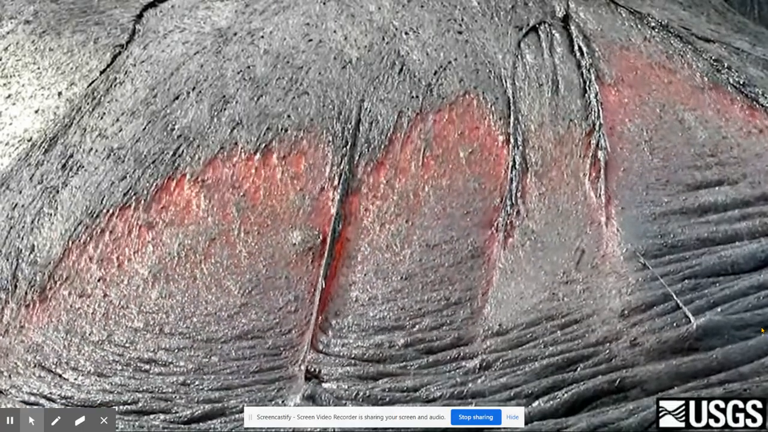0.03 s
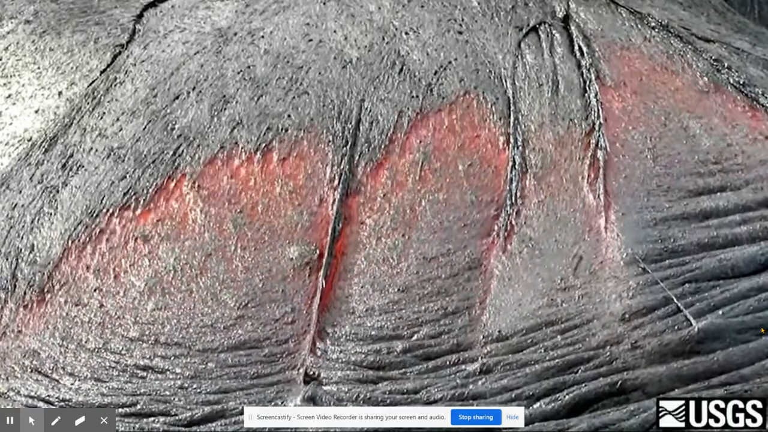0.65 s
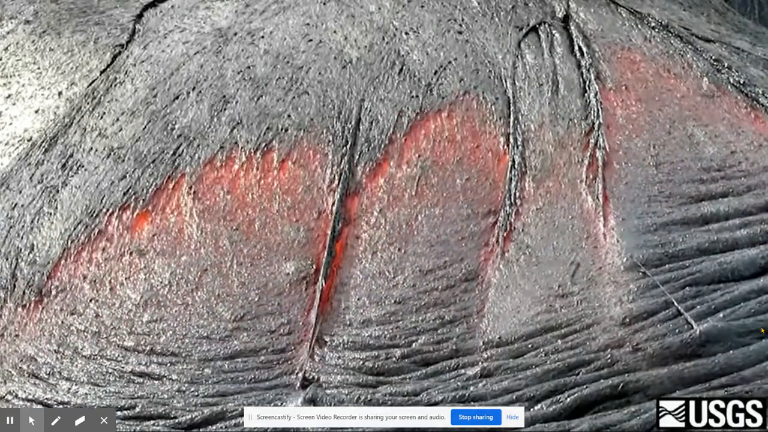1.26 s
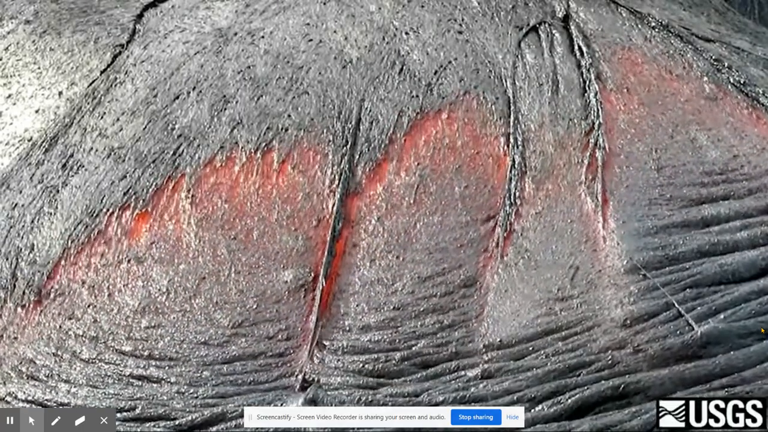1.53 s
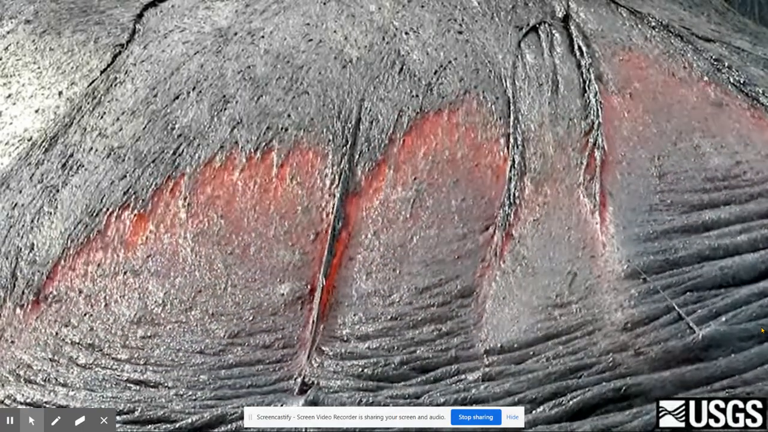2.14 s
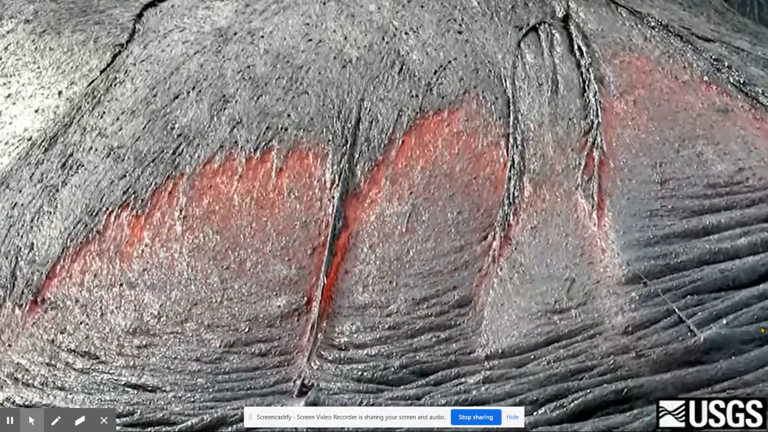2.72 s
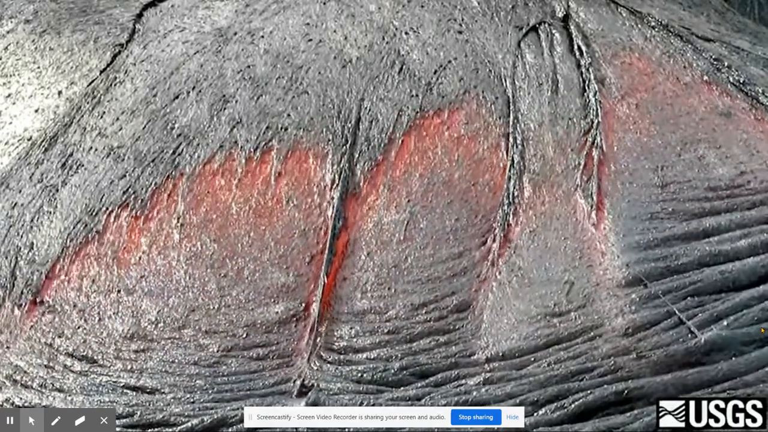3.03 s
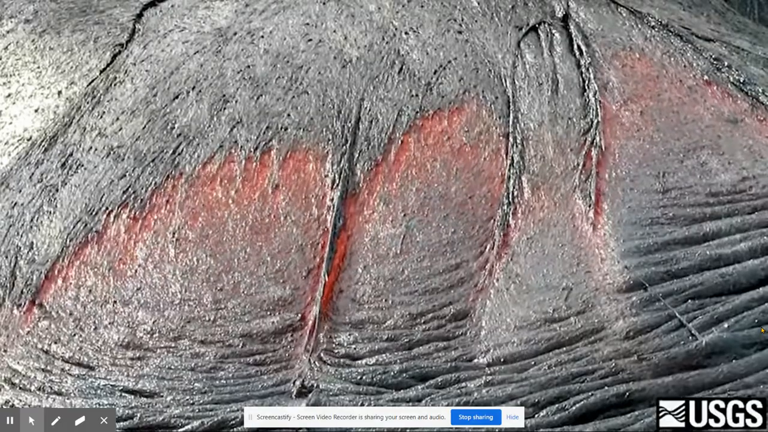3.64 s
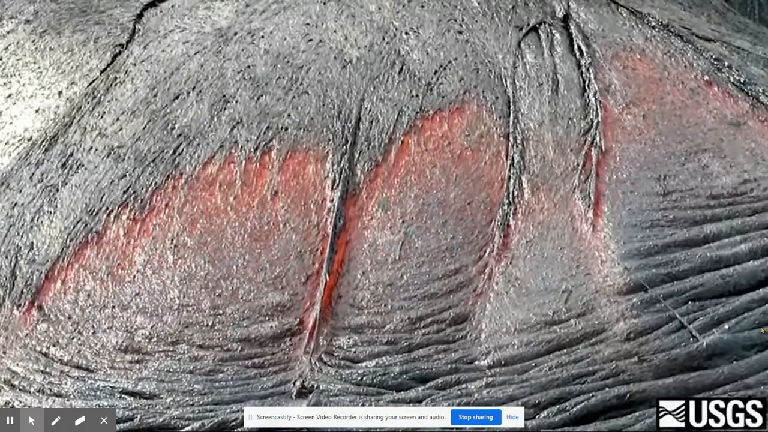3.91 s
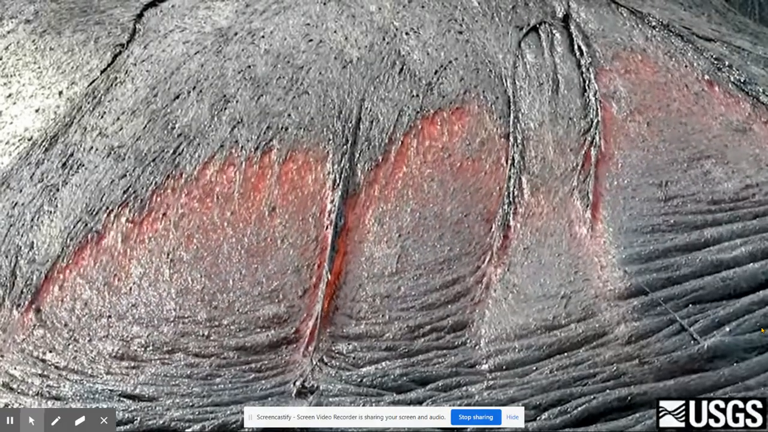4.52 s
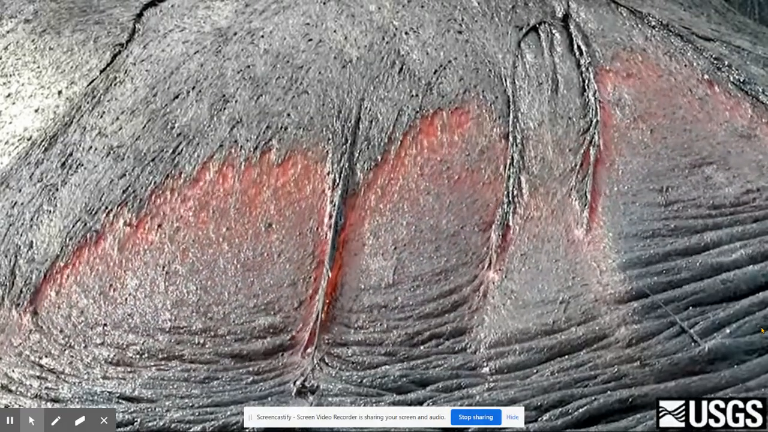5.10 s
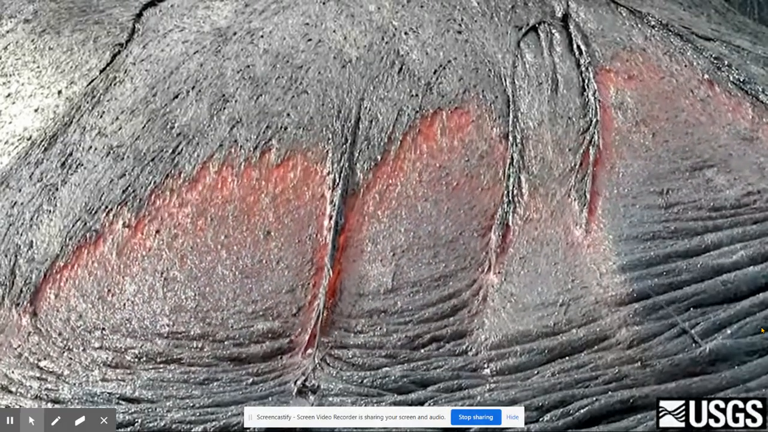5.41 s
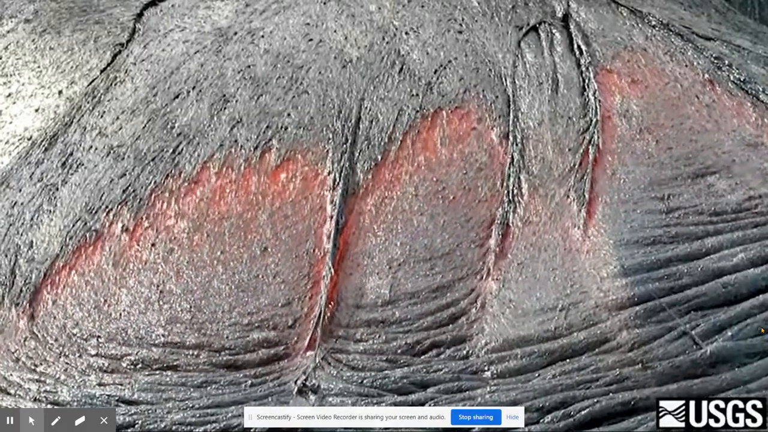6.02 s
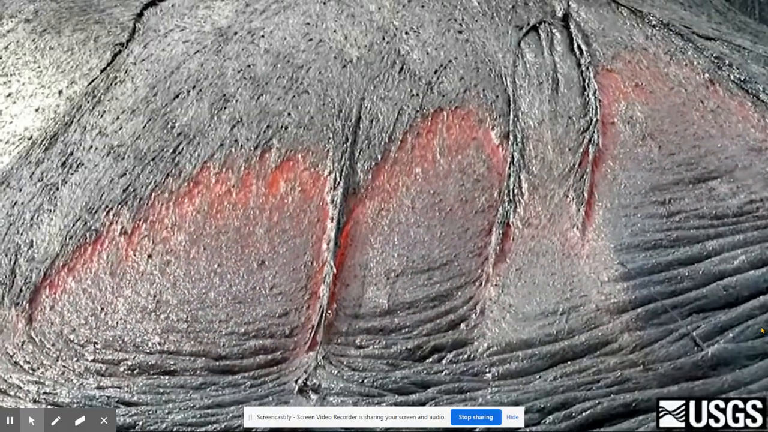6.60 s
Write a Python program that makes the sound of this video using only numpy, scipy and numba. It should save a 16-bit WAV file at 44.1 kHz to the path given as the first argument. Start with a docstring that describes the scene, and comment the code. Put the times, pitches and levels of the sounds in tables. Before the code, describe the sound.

Soft puffs of wind touch an outdoor microphone while glassy flakes snap off cooling lava in faint, scattered ticks and thin sizzles. The wind then builds into loud, irregular buffeting that thumps and rumbles over the crackle. A dull hiss lies behind it all, dipping after the hardest gusts and creeping back. Everything has a very short slap echo.

```python
"""A lava flow cools outdoors over a faint hiss, with one short slap echo on everything.
At first, flakes of its glassy crust snap off in sparse ticks and fine sizzling patches while light wind
brushes the microphone. From about 3.5 s strong gusts buffet it, louder and brighter as the air speeds up.
The strongest push the recorder's gain down, so the hiss ducks and creeps back.
The crust ticks on beneath the wind, which eases just before the end."""
import sys
import numpy as np
from scipy import signal
from scipy.fft import rfft, irfft, next_fast_len
from scipy.io import wavfile
from scipy.ndimage import uniform_filter1d
from numba import njit

SR = 44100
rng = np.random.default_rng(int(sys.argv[2]) if len(sys.argv) > 2 else 0)


def bounce(signal):
    """Save signal as a 16-bit WAV file at the path given by the first command-line argument."""
    frames = np.transpose(np.atleast_2d(signal))
    limited = np.clip(frames, -1, 1)
    pcm = np.round(limited * 32767).astype(np.int16)
    wavfile.write(sys.argv[1], SR, pcm)


N = 297675
TIME = np.arange(N) / SR

# gusts at the microphone: t/s, length/s, relative level/dB, rumble level/dB, nominal low-pass f/Hz
GUSTS = [(.01, 0.028, -34, -47.5, 179.6), (0.278, 0.12, -42.5, -41.5, 240),
         (0.72, 0.032, -35.5, -41.5, 267), (0.836, 0.064, -42.5, -45, 237), (1.024, .13, -44, -44, 230),
         (1.298, 0.32, -42.5, -44, 250), (1.662, 0.12, -31, -34.5, 586), (2.028, .08, -28.5, -35, 350),
         (2.142, .17, -43.5, -39.5, 268), (2.716, .13, -56.5, -50.5, 180), (2.983, 0.046, -35, -34, 244),
         (3.106, 0.048, -36.5, -42, 210), (3.298, 0.011, -29.5, -38, 430), (3.358, 0.09, -45, -44, 280),
         (3.491, 0.09, -27.5, -33, 512), (3.617, 0.0091, -17, -36, 900), (3.683, 0.014, -15.5, -33, 1040),
         (3.697, 0.097, -22.5, -26, 650), (3.975, 0.024, -23, -35.5, 530), (4.134, 0.091, -18.5, -28, 950),
         (4.308, 0.13, -27.5, -28.5, 624), (4.496, 0.22, -21.5, -27.5, 740), (4.759, 0.036, -28, -44, 730),
         (4.826, 0.027, -17, -19.5, 1000), (4.953, 0.079, -26, -37, 540), (5.188, 0.061, -28.5, -34, 430),
         (5.262, 0.27, -24, -31.5, 616), (5.365, 0.0067, -20.5, -32, 1000), (5.561, 0.068, -21, -25, 1025),
         (5.744, 0.2, -27.5, -31, 575), (6.039, 0.043, -14.5, -19.5, 1040),
         (6.093, 0.041, -12.5, -25, 1960), (6.247, 0.12, -19, -21.5, 1000),
         (6.27, .008, -15.5, -25.5, 1400), (6.385, 0.59, -36, -35, 382), (6.625, 0.033, -16, -24, 1380)]
# single eddies that knock on the microphone: t/s, level/dB, f/Hz
EDDIES = [(0.731, -38, 176), (1.691, -20.5, 184), (1.762, -27.5, 272), (2.031, -28.5, 217),
          (2.994, -26, 142), (3.298, -28.5, 251), (3.556, -19, 270), (3.619, -6, 294), (3.675, -11, 392),
          (4.194, -13, 380), (4.222, -24, 1240), (4.224, -12, 707), (4.384, -19.5, 335),
          (4.502, -21.5, 340), (4.83, -7.5, 307), (5.293, -14.5, 242), (5.377, -11.5, 330),
          (5.567, -33, 427), (5.613, -29, 1030), (5.619, -9, 193), (5.951, -21, 315), (6.09, -19, 770),
          (6.115, -19, 1540), (6.275, -12.5, 785), (6.649, -20, 520)]


def from_db(db):
    """Decibels to gain."""
    return 10 ** (np.asarray(db) / 20)


def unit_rms(x):
    """Scale to unit rms."""
    return x / np.sqrt(np.mean(x ** 2) + 1e-20)


def swells(events, rest_db, rise_db_per_s, fall_db_per_s):
    """Envelope in dB of events (t/s, length/s, level/dB) that rise, hold and fall over a resting level."""
    power = from_db(rest_db) ** 2
    for s, length, db in events:
        before_s, after_s = np.maximum(s - TIME, 0), np.maximum(TIME - s - length, 0)
        drop_db = rise_db_per_s * before_s + fall_db_per_s * after_s
        near = drop_db < 70
        power = power + np.bincount(np.flatnonzero(near), from_db(db - drop_db[near]) ** 2, N)
    return 10 * np.log10(power)


def coloured(x, spectrum):
    """EQ white input of unit rms to a spectrum (f/Hz, level/dB per Hz), rolling off below its first row."""
    hz, db = np.transpose(spectrum)
    size = next_fast_len(N)
    bins = np.maximum(np.fft.rfftfreq(size, 1 / SR), 1)
    gain = from_db(np.interp(np.log(bins), np.log(hz), db)) * np.minimum(bins / hz[0], 1)
    return irfft(rfft(x, size) * gain, size)[:N] * np.sqrt(SR / 2)


def local_rms(x, span_s):
    """Running rms over a soft-edged window."""
    size = max(int(span_s * SR), 2)
    return np.sqrt(np.abs(uniform_filter1d(uniform_filter1d(x * x, size), size)) + 1e-20)


def evened(x, span_s, evenness=1.0):
    """Iron out chance swells, so that the airflow sets the dynamics."""
    return x * (local_rms(x, 10 * span_s) / local_rms(x, span_s)) ** evenness


def flutter(rate_hz):
    """Smooth random modulation of unit rms."""
    pole = np.exp(-2 * np.pi * rate_hz / SR)
    return unit_rms(signal.lfilter([1], [1, -2 * pole, pole * pole], rng.standard_normal(N + SR))[SR:])


@njit
def swept_low_pass(x, tuning, damping):
    """Two-pole state-variable low-pass; tuning is tan(pi * corner / SR) at every sample."""
    out, band, low = np.zeros(len(x)), 0., 0.
    for i in range(len(x)):
        g = tuning[i]
        band_pass = (band + g * (x[i] - low)) / (1 + g * (g + damping))
        out[i] = low + g * band_pass
        band, low = 2 * band_pass - band, 2 * out[i] - low
    return out


def place(out, s, sound):
    """Mix a short sound in at s seconds."""
    at = int(np.clip(round(s * SR), 0, N - len(sound)))
    out[at:at + len(sound)] += sound


def wind(breeze_db=-54, breeze_hz=148, db_per_octave=19, trim_db=-0.5,
         flutter_db=3.5, stir_db=4.5, stir_s=0.0042, brightening=0.38, damping=1.775):
    """Turbulence buffets the microphone: faster air is louder and opens the filter."""
    # turbulent pressure ahead of the filter: f/Hz, relative level/dB
    turbulence = [(30, -60.5), (50, -35), (75, -38), (105, -28), (150, -25), (300, -27), (430, -28.5),
                  (600, -39), (850, -38.5), (1200, -42), (1700, -42), (2500, -50), (5000, -41)]
    slopes = dict(rise_db_per_s=696, fall_db_per_s=403)
    strength_db = swells([(s, length, db) for s, length, db, _, _ in GUSTS], breeze_db, **slopes)
    # the corner rides the same slopes as the level
    lifts = [(s, length, db_per_octave * np.log2(0.9 * hz / breeze_hz)) for s, length, _, _, hz in GUSTS]
    corner_hz = breeze_hz * 2 ** (swells(lifts, 0, **slopes) / db_per_octave)
    # the air speed flutters, and each passing eddy stirs it up for a few milliseconds
    stirred = sum(np.exp(-.5 * np.minimum(((TIME - s) / stir_s) ** 2, 20)) for s, _, _ in EDDIES)
    surge = from_db(flutter_db * flutter(rate_hz=45) + stir_db * np.minimum(stirred, 1))
    tuning = np.tan(np.pi * np.clip(corner_hz * surge ** brightening, 20, SR / 10) / SR)
    pressure = coloured(rng.standard_normal(N), turbulence)
    for _ in range(3):
        pressure = swept_low_pass(pressure, tuning, damping)
    return evened(pressure, span_s=0.034, evenness=0.94) * from_db(strength_db + trim_db) * surge


def eddies(typical_width_s=0.0029, typical_hz=330, size=2048):
    """Each eddy knocks with a few pressure cycles; small ones are higher and pass sooner."""
    out, t = np.zeros(N), (np.arange(size) - size / 2) / SR
    for (s, db, hz), phase in zip(EDDIES, rng.random(len(EDDIES))):
        swell = np.exp(-.5 * (t / typical_width_s) ** 2 * hz / typical_hz)
        place(out, s + t[0], from_db(db) * swell * np.cos(2 * np.pi * (hz * t + phase)))
    return out


def rumble():
    """The largest, slowest eddies put weight under each gust and linger after it."""
    # deep pressure swings: f/Hz, relative level/dB
    spectrum = [(20, -27.5), (30, -15), (40, -10.5), (50, -9), (60, 7.5), (68, -1.5), (85, 0.5),
                (105, -7.5), (140, -25.5), (250, -58), (1000, -85.5)]
    gusts = [(s, length, rumble_db) for s, length, _, rumble_db, _ in GUSTS]
    level_db = swells(gusts, rest_db=-55.5, rise_db_per_s=279, fall_db_per_s=169)
    pressure = evened(coloured(rng.standard_normal(N), spectrum), span_s=0.16)
    return from_db(level_db) * unit_rms(pressure)


def snap(low_hz, high_hz, size=256):
    """One fracture: a band-limited click with a steep top and the energy of 1 ms at unit rms."""
    low_hz, high_hz = np.minimum([low_hz, high_hz], SR * .45)
    pulse = signal.sosfilt(signal.butter(7, high_hz, fs=SR, output="sos"), signal.unit_impulse(size))
    pulse = signal.sosfilt(signal.butter(2, low_hz, "high", fs=SR, output="sos"), pulse)
    return pulse * np.sqrt(SR / 1000 / np.sum(pulse ** 2))


def flake_ticks(band_ratio=4.2, crumbs_db=-7.5, cluster_s=0.011, crumb_chance=0.02, size=1536):
    """The larger flakes snap off one by one, each amid a small cluster of lesser cracks."""
    # snapping flakes: t/s, level/dB, top edge f/Hz
    flakes = [(.2121, -45.5, 13500), (0.4707, -39.5, 4690), (.6907, -43.5, 4500), (0.9044, -59, 13400),
              (1.421, -58, 14000), (1.2226, -54.5, 7000), (1.7436, -40.5, 3200), (1.973, -41.5, 6400),
              (2.116, -44.5, 4970), (2.022, -53, 5500), (2.3333, -54, 13900), (2.405, -49.5, 12700),
              (2.4347, -36, 4970), (2.5129, -41.5, 10100), (3.1853, -52, 12900), (3.2013, -47.5, 8000),
              (3.4547, -46.5, 9000), (3.957, -49.5, 3800), (4.2133, -51.5, 5000), (4.125, -51.5, 4760),
              (4.4908, -48, 3500), (5.3288, -51.5, 4800), (5.4881, -39.5, 3630), (5.492, -51, 6500),
              (5.82, -43.5, 5800), (5.9458, -50.5, 8000), (6.2827, -41.5, 3400), (6.7304, -49, 10200)]
    out, t = np.zeros(N), (np.arange(size) - size // 2) / SR
    for (s, db, hz), (draw, push) in zip(flakes, rng.random((len(flakes), 2, size))):
        crumbs = (draw < crumb_chance) * (2 * push - 1) * np.exp(-np.abs(t) / cluster_s)
        crumbs /= np.linalg.norm(crumbs) + 1e-9
        force = signal.unit_impulse(size, "mid") + from_db(crumbs_db) * crumbs
        place(out, s + t[0], from_db(db) * np.convolve(force, snap(hz / band_ratio, hz)))
    return out


def skin_sizzle(per_s=400, spread_db=3.5, hold_s=0.004, lead_db=9.5, rest_db=-82.5, wander_db=4.5):
    """Tiny fractures run through the glassy skin in patches, each set off by one thin, high snap."""
    # patches of skin that crack at once: t/s, level/dB
    patches = [(.21, -68), (.628, -70), (.728, -66), (.817, -82), (1.42, -68), (1.832, -68), (2.115, -65),
               (2.405, -62.5), (2.717, -57), (2.79, -69), (2.838, -64.5), (2.922, -68), (3.003, -65),
               (3.105, -73), (3.187, -66), (3.353, -66), (3.456, -63), (4.785, -68), (5.49, -67),
               (5.637, -64), (5.82, -68), (6.552, -65.5), (6.603, -59)]
    # tone of the finest flakes: f/Hz, relative level/dB
    spectrum = [(1500, -14.5), (4000, -6), (8000, -12.5), (11000, -3.5), (13500, -3), (15500, -9)]
    bed_db = rest_db + wander_db * flutter(rate_hz=8)
    bursts = [(s, hold_s, db) for s, db in patches]
    level_db = swells(bursts, bed_db, rise_db_per_s=1204, fall_db_per_s=504)
    sizes = from_db(spread_db * np.minimum(rng.exponential(1, N), 3)) * rng.choice([-1, 1], N)
    fractures = sizes * (rng.random(N) < per_s / SR)
    out = from_db(level_db) * unit_rms(coloured(fractures, spectrum))
    for s, db in patches:
        place(out, s, from_db(db + lead_db) * snap(low_hz=10000, high_hz=15000))
    return out


def crust_crackle(per_s=32, softest_db=-65.5, spread_db=4.0, bands=10):
    """Faint snaps of mixed size and pitch scatter at random through the crust."""
    sizes = from_db(softest_db + spread_db * np.minimum(rng.exponential(1, N), 2)) * rng.choice([-1, 1], N)
    fractures = sizes * (rng.random(N) < per_s / SR)
    band = rng.integers(0, bands, N)
    snaps = [snap(hz / 4.8, hz * 2.2) for hz in np.geomspace(2500, 12000, bands)]
    return sum(signal.oaconvolve(fractures * (band == k), click)[:N] for k, click in enumerate(snaps))


def hiss(level_db=-60.5):
    """A smooth, rather dull bed of noise."""
    # steady outdoor hiss: f/Hz, relative level/dB
    spectrum = [(100, -0.5), (300, 5), (600, 1), (1000, -1), (2000, -3.5), (4000, -9), (6000, -13),
                (9000, -16), (11000, -17), (13500, -15), (15500, -20)]
    return from_db(level_db) * unit_rms(coloured(rng.standard_normal(N), spectrum))


def scene():
    """Wind, crust and hiss in a mono mix."""
    return (wind() + eddies() + rumble() + flake_ticks() + skin_sizzle() + crust_crackle() + hiss())[None]


def gain_control(x, threshold_db=-16.0, release_db_per_s=5.0, span_s=0.0059):
    """The gain ducks at once when the level passes the threshold, then creeps back."""
    over_db = np.maximum(20 * np.log10(local_rms(x, span_s)) - threshold_db, 0)
    recovered_db = release_db_per_s * TIME
    return x * from_db(recovered_db - np.maximum.accumulate(over_db + recovered_db, axis=-1))


def record(dry, ceiling=0.41, low_cut_hz=38, echo_s=0.027, echo_db=-9.5, high_cut_hz=15800):
    """The chain: ducking under gusts, soft clip, low cut, one slap echo, steep high cut."""
    clipped = ceiling * np.tanh(gain_control(dry) / ceiling)
    direct = signal.sosfilt(signal.butter(2, low_cut_hz, "high", fs=SR, output="sos"), clipped)
    slap = from_db(echo_db) * np.pad(direct, ((0, 0), (round(echo_s * SR), 0)))[:, :N]
    return signal.sosfilt(signal.ellip(10, .2, 70, high_cut_hz, fs=SR, output="sos"), direct + slap)


dry = scene()
out = record(dry)
bounce(out)
```